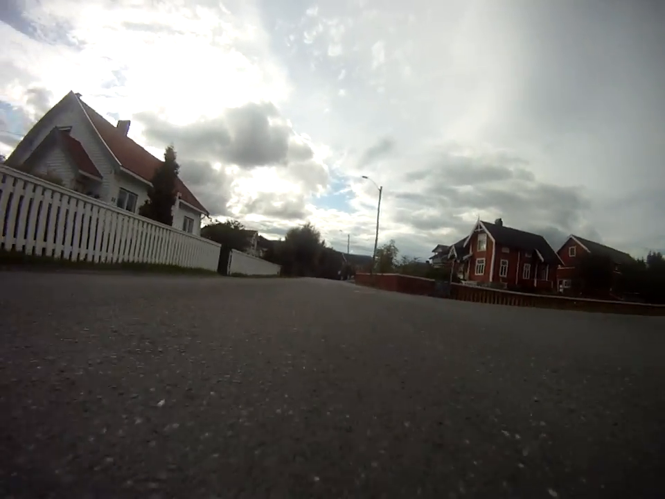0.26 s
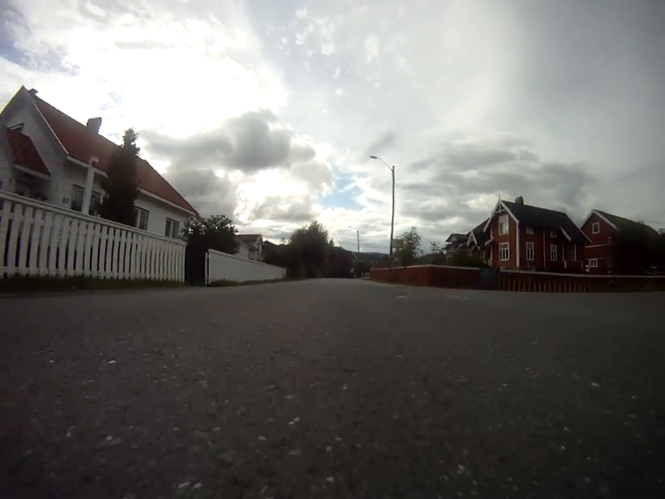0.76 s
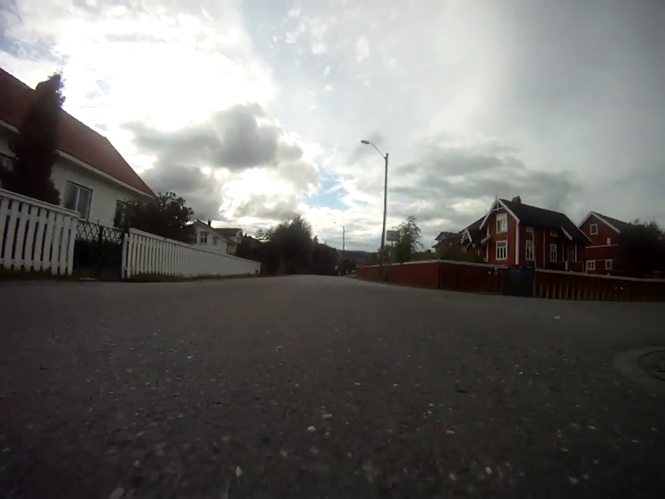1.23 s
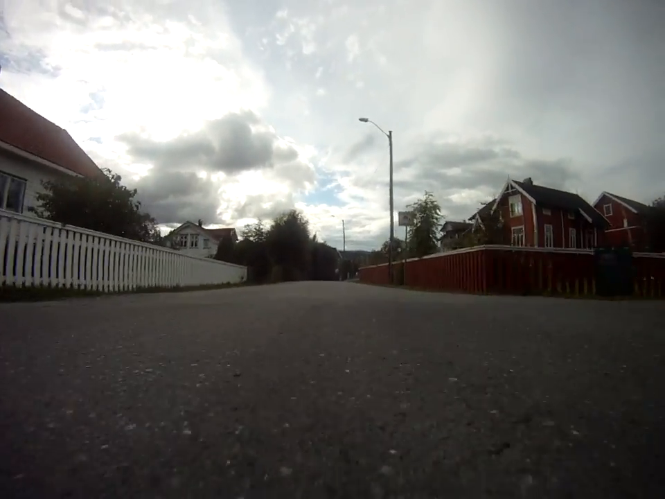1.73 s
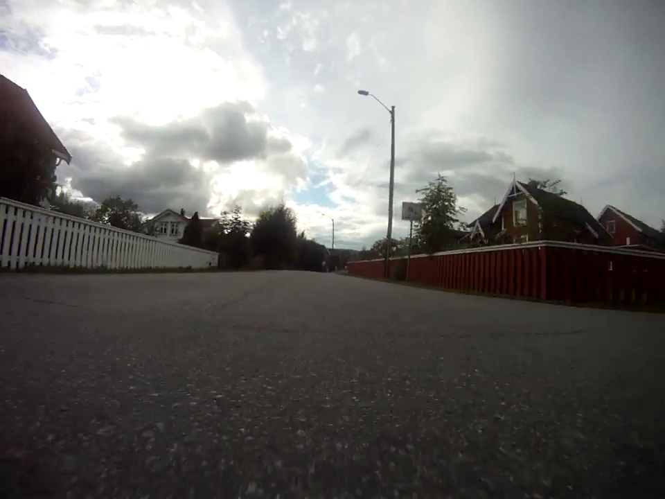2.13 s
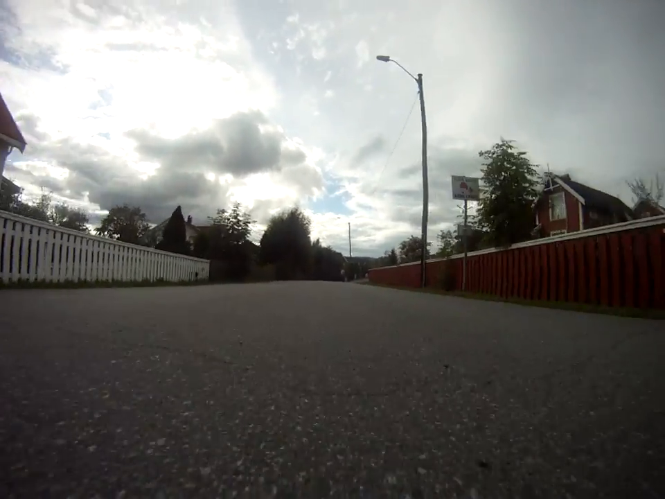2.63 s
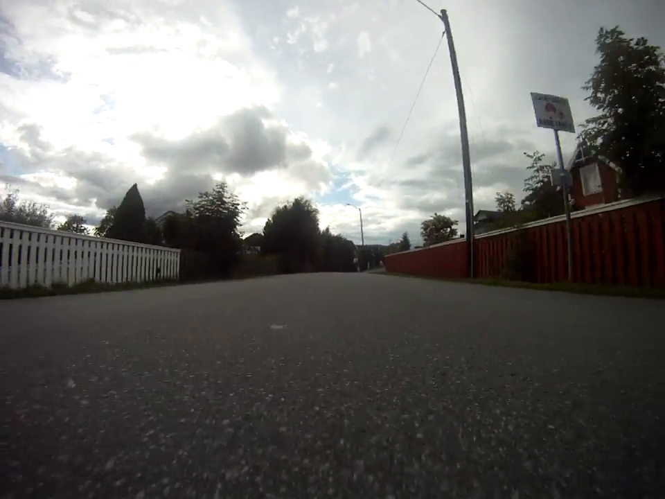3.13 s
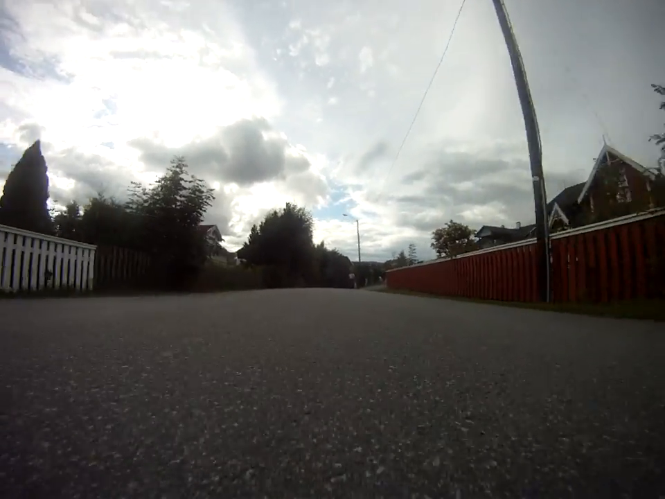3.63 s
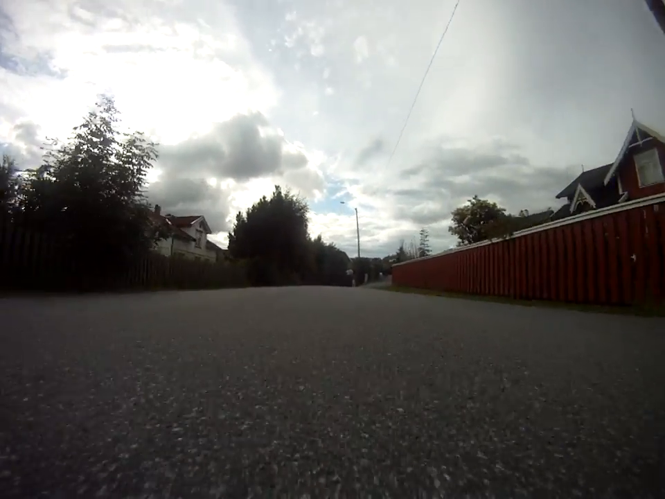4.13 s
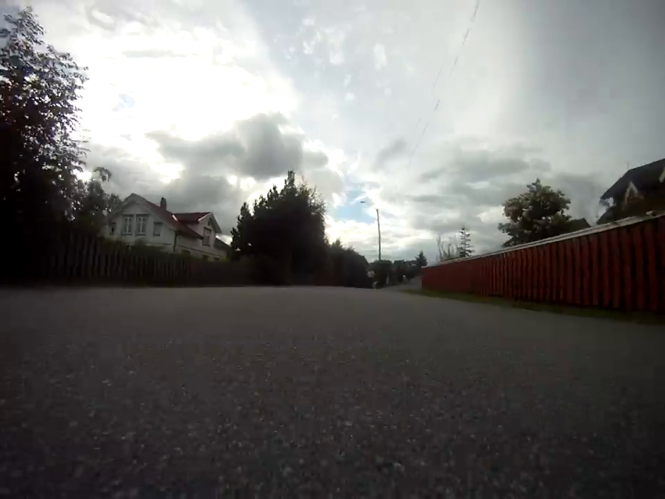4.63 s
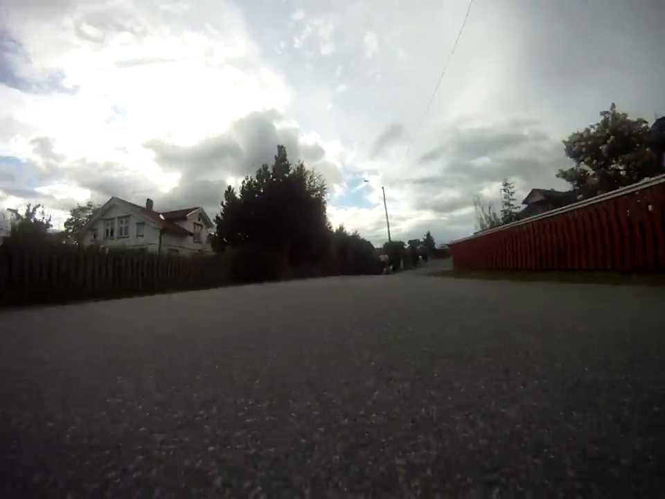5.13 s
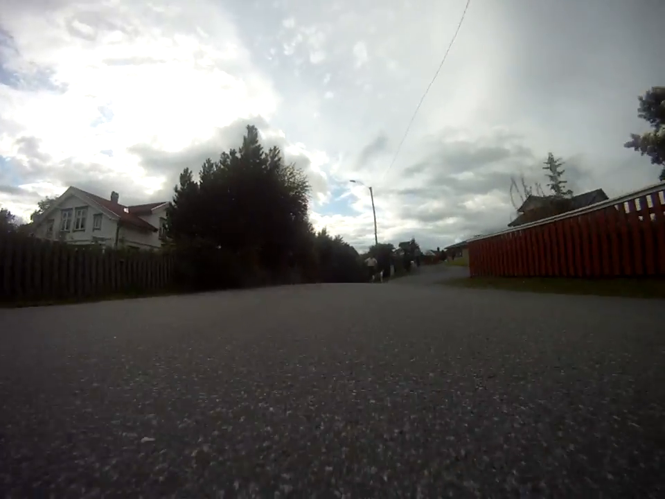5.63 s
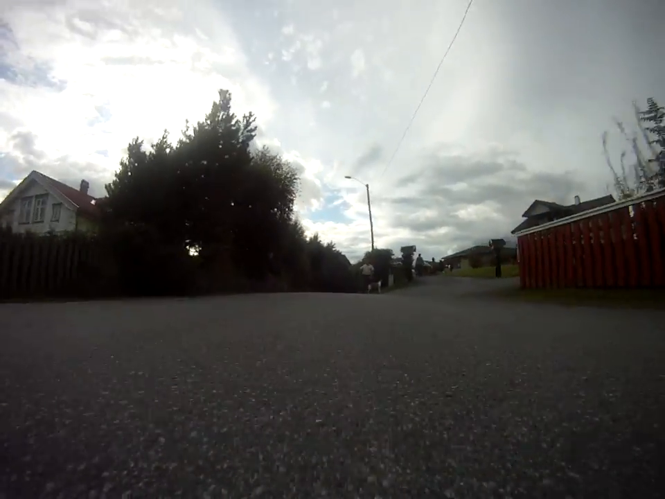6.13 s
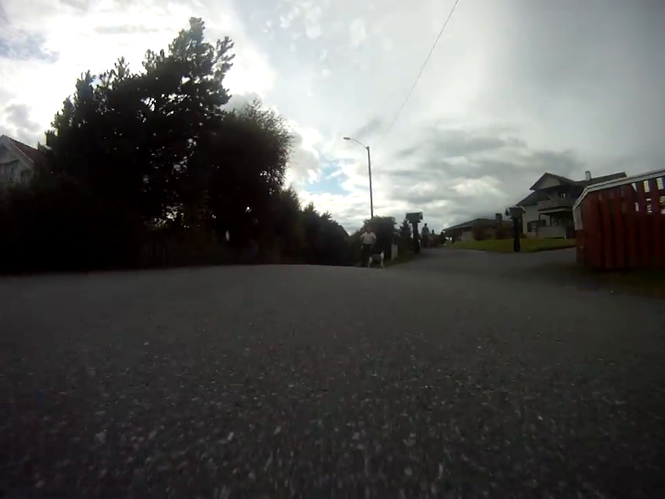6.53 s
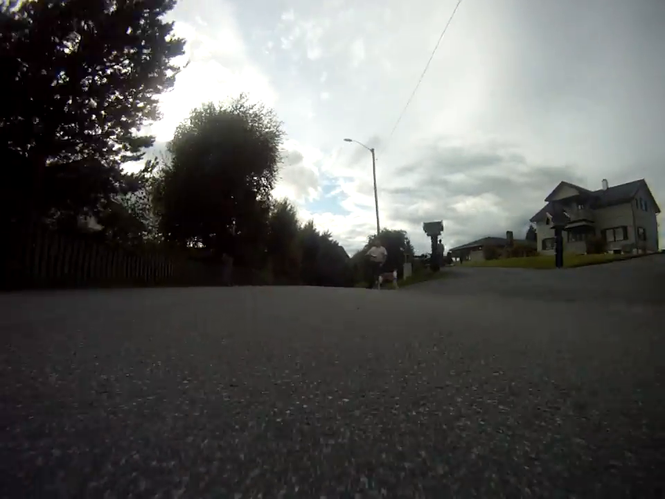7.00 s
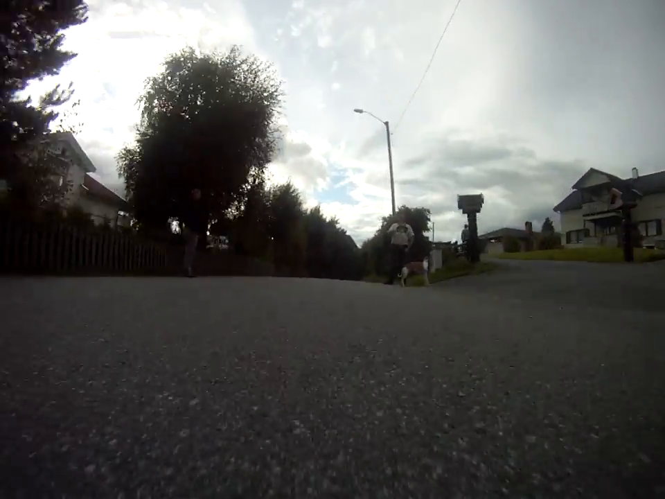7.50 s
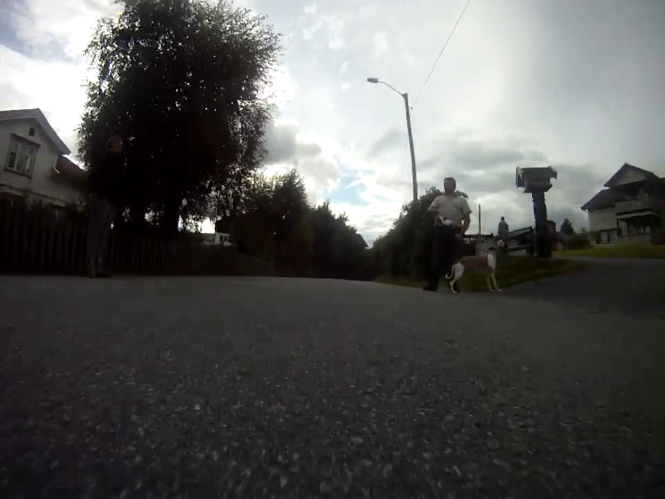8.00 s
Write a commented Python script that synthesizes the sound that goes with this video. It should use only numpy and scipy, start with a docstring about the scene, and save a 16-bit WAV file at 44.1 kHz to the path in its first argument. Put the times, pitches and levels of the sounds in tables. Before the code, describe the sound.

A longboard speeds down a residential street, heard from a camera fixed low on the deck. A low wavering drone and fast rattling chatter run throughout with crackling grit. Stones and cracks clack in clusters, then short sideways scrubs swell into rough rising howls that stop as the wheels grip. The sound is close, boxy and slightly overloaded, without echo.

```python
"""A low, unsteady drone near 100 Hz runs throughout, with a chatter on each of its turns: a longboard rolls
fast over rough asphalt, its deck and mount swinging, and the housing of a camera low on the deck knocks along.
Grit crackles as chance ticks through the housing's modes; coloured noise makes the rumble and wheel roar.
Stones and cracks give decaying sine clacks and short rattles.
In sideways scrubs the rattle hushes and a rough three-partial howl climbs, until the wheels grip again."""
import sys
import numpy as np
from scipy import signal
from scipy.fft import rfft, irfft, next_fast_len
from scipy.io import wavfile
from scipy.ndimage import map_coordinates

SR = 44100
rng = np.random.default_rng(int(sys.argv[2]) if len(sys.argv) > 2 else 0)


def generate_wav(sig):
    """Save sig (samples, or channels by samples) to the path in sys.argv[1] as 16-bit PCM at SR."""
    pcm = np.round(np.clip(np.atleast_2d(sig).T, -1, 1) * 32767).astype(np.int16)
    wavfile.write(sys.argv[1], SR, pcm)


N = 364266

# Main resonance of deck and mount, before its jitter. Each row: time in seconds, pitch in Hz.
DECK_PITCH = [(0.0, 111.6), (0.3, 100.7), (0.58, 112.7), (0.65, 98.14), (0.89, 97.48), (1.04, 101.5),
              (1.12, 117.6), (1.18, 96), (1.49, 108.4), (1.6, 91.5), (1.68, 106.1), (1.95, 93.3),
              (2.24, 105), (2.41, 97), (2.45, 87.06), (2.54, 105), (2.68, 97.9), (2.72, 109.2), (2.83, 94),
              (2.93, 107.2), (2.97, 94.76), (3.03, 114.4), (3.27, 105), (3.33, 117), (3.5, 103.3),
              (3.89, 115.5), (3.95, 102.4), (4.48, 109), (4.73, 93.12), (4.81, 108.3), (4.86, 89.7),
              (4.95, 104.3), (5.04, 94.96), (5.1, 108.6), (5.16, 96.07), (5.44, 108.7), (5.65, 99.3),
              (5.72, 112), (5.92, 95.52), (6.08, 106.6), (6.12, 96.96), (6.26, 116.5), (6.56, 88.05),
              (6.81, 104), (6.86, 118.2), (6.94, 120.3), (7.16, 96.53), (7.32, 110.7), (7.49, 90.9),
              (7.63, 103.5), (7.68, 94.9), (7.8, 106.9), (8.05, 98.93), (8.11, 111.4), (8.18, 99.16),
              (8.25, 110.5)]
# Moments when the swing stalls. Each row: centre in seconds, depth of the dip in its drive in dB.
SWING_STALLS = [(0.259, 6), (0.55, 5), (.97, 9), (1.22, 5), (1.632, 8), (2.62, 9.5), (2.871, 8.5),
                (2.999, 9), (3.319, 19), (3.43, 14.5), (3.77, 4.5), (4.06, 3.5), (4.3, 10), (4.399, 11),
                (4.81, 6), (4.949, 8), (5.513, 14.5), (6.29, 5), (6.632, 8), (6.791, 9.5), (7.635, 11.5),
                (8.03, 9.5)]
# Coarseness of the asphalt under the board. Each row: time in seconds, relative level in dB.
ROAD_COARSENESS = [(0, -28.5), (.25, -28), (.65, -31), (1.1, -26.5), (1.3, -28.5), (1.55, -26),
                   (1.8, -30.5), (1.93, -23), (2.14, -31.5), (2.45, -27.5), (2.95, -27.5), (3.25, -31),
                   (3.8, -29.5), (4.0, -29.5), (4.3, -26.5), (4.55, -29), (4.85, -29), (5.15, -28),
                   (5.45, -27), (5.68, -27.5), (5.9, -29), (6.3, -28.5), (6.55, -29.5), (6.95, -27.5),
                   (7.4, -28), (7.78, -27), (8.26, -26)]
# Stones and cracks under the wheels. Each row: start in seconds, strength of the blow in dB,
# its treble relative to the blow in dB, pitch of the clack in Hz.
STONE_BLOWS = [(0.065, -7.5, -27, 1060), (0.105, -8, -14, 935), (0.158, -7.5, -33, 1100),
               (0.514, -12.5, -16, 940), (0.832, -8, -15, 1090), (0.842, -11, -29, 1030),
               (0.982, -4.5, -35, 810), (0.991, -7.5, -26, 870), (1.043, -9, -24, 1030),
               (1.057, -4, -24, 953), (1.065, -7.5, -28.5, 925), (1.1, -5.5, -31, 950),
               (1.145, -2.5, -26, 1060), (1.182, -8, -30, 980), (1.464, -3.5, -21, 915),
               (1.492, -8, -32, 1030), (1.544, -17, -13, 990), (1.724, -9, -20.5, 820),
               (1.733, -8, -30, 775), (1.749, -10, -14, 1102), (1.771, -7.5, -32, 1070),
               (1.841, -8.5, -14, 910), (1.881, -3.5, -18, 646), (1.891, -8, -27, 630),
               (1.966, -7, -36, 630), (2.049, -13.5, -31, 650), (2.299, -1.5, -18, 810),
               (2.41, -3.5, 0.5, 795), (2.421, -5, 3, 1080), (2.433, -8, -24, 1030), (2.444, -18, -28, 900),
               (2.458, -11, -30, 796), (2.47, -3, -9, 1020), (2.487, -11, -22, 950),
               (2.659, -9.5, -33, 1045), (2.712, -4.5, -20, 1090), (2.721, -1.5, -28, 955),
               (2.779, -2, -14, 835), (2.788, -8.5, -3, 1220), (2.81, -9, -20, 850),
               (2.823, -4.5, -9.5, 980), (2.895, -9, -32, 1130), (2.941, -4, -23, 890),
               (2.961, -5, -27, 990), (3.039, -13.5, -22, 1132), (3.608, -16, -4, 990),
               (3.666, -8, -20, 1040), (3.676, -9, -25, 780), (4.163, -13, -2, 860),
               (4.263, -14.5, -28, 856), (4.362, -17, -30, 950), (4.508, -11, -35, 980),
               (4.574, -11, -34, 907), (4.623, -12, -32, 990), (4.678, -9, -41, 1069),
               (4.722, -15, -5, 993), (4.739, -9, -6, 1006), (4.751, -4.5, -34, 920),
               (5.022, -10.5, -32, 970), (5.15, -12, -29, 994.7), (5.673, -11.5, -13.5, 1110),
               (5.722, -11, -35, 1130), (6.173, -9, -4, 660), (6.193, -7.5, -22, 590.3),
               (6.659, -12, -5.5, 950), (6.732, -18.5, 1, 1090), (6.822, -8.5, -9, 647),
               (6.828, -0.5, -5.5, 1130), (6.898, -4, -22, 1090), (6.921, -8.5, -28, 870),
               (6.933, -9, -23, 840), (6.968, -10, -30, 1103), (7.022, -11, -32, 810),
               (7.088, -10, -16, 1020), (7.115, -26, -6, 990), (7.122, -7.5, -24, 1045),
               (7.205, -8.5, -24, 1080), (7.261, -9, -25, 1090), (7.286, -12, -37, 601),
               (7.438, -10, -30, 820), (7.448, -8.5, -24, 1020), (7.476, -7.5, -7.5, 770),
               (7.479, -6, -7, 830), (7.486, -6, -6.5, 1000), (7.535, -8.5, -28, 954),
               (7.571, -5, -28, 970), (7.581, -9.5, -28, 1050), (7.608, -8, -29, 1070),
               (7.62, -12, -27, 1080), (7.644, -5.5, -13, 960), (7.656, -7.5, -29, 1060),
               (7.683, -11.5, -22, 1065), (7.737, -8.5, -25, 593), (7.842, -8, -25, 900),
               (7.881, -4.5, -25, 1040), (7.986, -5, -28, 990), (8.227, -8, -19, 980)]
# Modes of the camera housing round the microphone. Each row: pitch in Hz, width in Hz, relative level in dB.
HOUSING_MODES = [(332, 580, -14), (422, 337, 0.5), (816, 352, 1), (1096, 388, 0.5), (2074, 247, -3.5),
                 (2385, 280, -7), (3560, 346, -9), (4070, 2800, -21.5), (7260, 8400, -41.5)]
# Spectrum of the board's rumble. Each row: frequency in Hz, relative level in dB per Hz.
RUMBLE_SPECTRUM = [(15, -28), (30, -10), (50, -23), (72, 6), (85, 10), (103, -5.5), (125, 5.5), (155, 3),
                   (195, -1.5), (280, -10.5), (400, -13.5), (700, -27), (1500, -46)]
# Spectrum of the wheels' roar. Each row: frequency in Hz, relative level in dB per Hz.
WHEEL_SPECTRUM = [(150, -40), (350, -16), (520, 8), (660, 0), (850, -5), (1200, -5), (1500, -14.5),
                  (2100, -5), (2800, -32), (3500, -18.5), (5000, -57), (7000, -69)]
# Colour of the snap of the sharper stones. Each row: frequency in Hz, gain in dB.
SNAP_COLOUR = [(300, -1), (1200, -4), (1600, 3.5), (2400, 2), (3600, -7.5), (5000, -9.5), (8000, -15),
               (15000, -43)]
# Response of the sealed camera at the microphone. Each row: frequency in Hz, gain in dB.
CAMERA_RESPONSE = [(20, 0.5), (5300, -3.5), (5850, -11), (6150, -15.5), (6600, -6.5), (12000, -5.5),
                   (15200, -10), (15800, -25)]
# Sideways scrubs of the wheels. Each row: moment of grip in seconds, length of the slide before it in seconds,
# peak roar in dB before its flutter, hush of the rattle in dB, howl level in dB, first howl pitch in Hz,
# last howl pitch in Hz, shudder at the grip in dB (negative: a dip).
WHEEL_SCRUBS = [(3.632, 0.22, -25.5, 2.5, -33, 471, 660, 5), (3.871, 0.089, -38, 0.5, -32, 470, 507, -3),
                (4.166, 0.25, -29.5, 3, -34, 490, 670, -2), (6.171, 0.15, -24, 4.5, -35, 487, 648, 9),
                (6.671, 0.11, -26.5, 2, -41, 559, 705.4, 6.5), (6.829, 0.13, -22.5, 1.5, -34, 510, 700, 5)]

# Swing: cap on its size before hush and flutter, drive, and dB lost per dB of hush in a scrub
STOP_DB, DRIVE_DB, SWING_HUSH = -12, 4.5, 1
JOSTLE_RATE, STEADY = 50, 1.7  # random knots per second; steady part relative to the jostling
STALL_S = .024  # half length of a stall
KICK_DB = -7.8  # stones above this level kick the swing into step
# Turns of the swing, in cycles: the knock, the knock back, the lean of the crests
KNOCK_TURN, RETURN_TURN, LEAN_TURN = .26, .88, .1
THUMP_S, SCRAPE_T60 = .0032, .0045  # length of a thump, 60 dB decay of a scrape, in seconds
GRIT_HISS = .12  # hiss of the finest grit relative to its ticks
PATCH_DB, PATCH_RATE = .8, 30  # patches in the asphalt: depth, random knots per second
# Change of the rattle by a 0 dB stone, and the time constant of its return in seconds
AFTER_STONE_DB, AFTER_STONE_S = -1, 0.0075
CLACK_T60, BODY_T60 = .017, .008  # 60 dB decay of a clack and of its lower body, in seconds
FIRST_CONTACT = 0.73  # a stone's first contact relative to the buzz after it
STRAIGHT_DB, RELEASE_S = -38, 0.053  # roar in straight rolling before its flutter; fade time after a scrub
GRIP_S = 0.019  # half length of the shudder, and fade time of the howl, at the grip
HOWL_ROUGH, HOWL_FLUTTER = .36, 50  # random part of the howl (0-1), its knots per second
IMAGE_HZ, TOP_HZ = 12000, 15800  # centre of the mirrored fizz; upper limit of the band


def amp(db):
    """Decibels to gain."""
    return 10 ** (np.asarray(db) / 20)


def unit(x):
    """Scale to rms 1."""
    return x / np.sqrt(np.mean(np.abs(x) ** 2) + 1e-20)


def curve(rows):
    """(s, value) rows joined by lines, one value per sample."""
    return np.interp(np.arange(N) / SR, *np.transpose(rows))


def colour(points):
    """Gain as a function of frequency through (Hz, dB) points."""
    f, db = np.transpose(points)
    return lambda hz: amp(np.interp(np.log(hz + 1), np.log(f + 1), db))


def filtered(x, response):
    """x times a complex response of frequency."""
    m = next_fast_len(N + 8192)
    spectrum = rfft(x, m) * response(np.fft.rfftfreq(m, 1 / SR))
    return irfft(spectrum, m)[:N]


def noise(points):
    """Coloured noise of rms 1."""
    return unit(filtered(rng.standard_normal(N), colour(points)))


def wobble(rate):
    """A smooth random curve, rate knots a second."""
    knots = rng.standard_normal(4096)
    return map_coordinates(knots, [np.arange(N) * rate / SR], mode="mirror")


def swing(hush_db):
    """Complex motion of the deck: the road jostles the resonance, stops cap it, bumps turn it against itself."""
    drive = amp(DRIVE_DB) * unit(STEADY + wobble(JOSTLE_RATE) + 1j * wobble(JOSTLE_RATE))
    for s, depth_db in SWING_STALLS:
        past = (np.arange(N) / SR - s) / STALL_S
        # the drive dips and comes back with its sign turned
        drive = drive * (past + 1j * amp(-depth_db)) / np.hypot(past, 1)
    capped = drive / (1 + np.abs(drive) ** 4) ** (1 / 4)
    turns = np.cumsum(curve(DECK_PITCH)) / SR
    turns = turns + .065 * wobble(45) + .035 * wobble(120)
    size = amp(STOP_DB - SWING_HUSH * hush_db + 1.02 * wobble(130))
    return size * capped * np.exp(2j * np.pi * turns)


def in_step(motion):
    """Hard stones kick the swing into step: its phase meets the knock at each blow, eased in between."""
    at = [round(s * SR) for s, db, *_ in STONE_BLOWS if db > KICK_DB]
    shift = np.unwrap(2 * np.pi * KNOCK_TURN - np.angle(motion[at]))
    return motion * np.exp(1j * np.interp(np.arange(N), at, shift))


def drone(motion, stiff=0.28, lopsided=0.56):
    """The mount stiffens towards its stops, more on one side: the crests grow pointed and lean."""
    x = motion.real
    leaning = (motion * np.exp(2j * np.pi * LEAN_TURN)).real
    shaped = x + stiff * x * np.abs(x) - lopsided * leaning ** 2
    return amp(-1.0) * filtered(shaped, colour([(10, -38), (45, -3), (70, -0.5), (1000, 10.0)]))


def housing(hz):
    """Causal response of the camera housing: resonant modes of alternating sign."""
    total = 0
    for k, (centre, width, db) in enumerate(HOUSING_MODES):
        damping = 1j * hz * width
        total = total + (-1) ** k * amp(db) * damping / (centre * centre - hz * hz + damping)
    return total


def strike(pushes, hard_share, soft_hz=1100):
    """A share of the contacts is hard; the others are cushioned and lose their treble."""
    hard = rng.random(N) < hard_share
    cushioned = filtered(pushes * ~hard, lambda hz: 1 / (1 + 1j * hz / soft_hz - (hz / soft_hz) ** 2))
    return pushes * hard + amp(1.0) * cushioned


def contacts(motion, turn, scatter_db):
    """One push per swing, about turn cycles after its top, each of a chance size."""
    turns = np.unwrap(np.angle(motion)) / (2 * np.pi) - turn + .025 * wobble(200)
    at = np.flatnonzero(np.diff(np.floor(turns)) > 0)
    chance = np.clip(rng.standard_normal(N)[at], -3, 1.0)
    return np.bincount(at, amp(scatter_db * chance) * np.sqrt(np.abs(motion[at])), N)


def chatter(motion, road, firm):
    """The housing knocks both ways and scrapes for a moment; the more uneven lower knock thumps the deck."""
    lower = contacts(motion, KNOCK_TURN, scatter_db=6)
    knocks = contacts(motion, RETURN_TURN, scatter_db=2.5) - lower
    t = np.arange(SR // 50) / SR
    scrape_level = signal.fftconvolve(np.abs(knocks), t * amp(-60 * t / SCRAPE_T60))[:N]
    scrape = scrape_level * rng.standard_normal(N)
    pushes = strike(unit(knocks) + 0.96 * unit(scrape), hard_share=.5 * firm)
    ring = unit(filtered(pushes, housing))
    dent = np.maximum(1 - np.abs(2 * t / THUMP_S - 1), 0)  # triangular push
    dents = signal.fftconvolve(-lower, dent)[:N]
    thump = unit(filtered(dents, colour([(70, -12), (130, -15), (190, 1), (500, 1)])))
    return amp(-0.5) * road * ring + amp(-14.5) * np.sqrt(road) * thump


def grit(road, firm, per_second=380, scatter_db=4.5):
    """Countless small stones tick under the four wheels and ring the housing."""
    hit = rng.random(N) < per_second / SR
    scatter = amp(scatter_db * np.minimum(rng.standard_normal(N), 1))
    ticks = hit * rng.standard_normal(N) * scatter
    pushes = unit(ticks) + GRIT_HISS * rng.standard_normal(N)
    return road * amp(-7.5) * unit(filtered(strike(pushes, hard_share=.75 * firm), housing))


def rolling(road, roar_db, hush_db, rumble_hush=1.0):
    """Broad rumble of the board, which sinks in a slide, and the fluttering roar of its wheels."""
    rumble = amp(-8.5 - rumble_hush * hush_db) * np.sqrt(road) * noise(RUMBLE_SPECTRUM)
    roar = amp(roar_db + wobble(40)) * noise(WHEEL_SPECTRUM)
    return rumble + roar


def roughness():
    """Shaking by the road in dB: its coarseness, chance patches, and a slight dip after each stone."""
    t = np.arange(SR // 4) / SR
    at = [round(row[0] * SR) for row in STONE_BLOWS]
    jolts = np.bincount(at, [amp(row[1]) for row in STONE_BLOWS], N)
    aftermath = signal.fftconvolve(jolts, np.exp(-t / AFTER_STONE_S))[:N]
    return curve(ROAD_COARSENESS) + PATCH_DB * wobble(PATCH_RATE) + AFTER_STONE_DB * aftermath


def firmness(hush_db, coarse_db=-29, softening=4.2):
    """Contacts are harder on coarse road and turn soft while the wheels slide, 0-1."""
    smooth_db = np.minimum(curve(ROAD_COARSENESS) - coarse_db, 0)
    return amp(smooth_db - softening * np.maximum(hush_db, 0))


def buzz(envelope):
    """A sharp first contact and a cluster of spiky ones after it, with unit energy."""
    chance = rng.standard_normal(len(envelope))
    burst = chance ** 3 * envelope  # cubing makes it spiky
    burst = burst / np.linalg.norm(burst)
    burst[0] -= FIRST_CONTACT
    return burst / np.linalg.norm(burst)


def stones(rattle=0.0055, rise=0.00054, least_snap=0.023, thud_hz=340, thud_t60=0.013,
           settle_db=-16, settle_t60=0.077, least_buzz=0.79, body_ratio=0.64):
    """A stone or crack jolts the board: a thud, a hollow two-mode clack, a housing buzz and a treble snap."""
    rings, blows, snaps = np.zeros((3, N + SR))
    t = np.arange(SR // 20) / SR
    onset = 1 - np.exp(-t / rise)
    for s, db, treble_db, hz in STONE_BLOWS:
        # harder jolts rattle for longer
        envelope = onset * np.exp(-(t / (rattle * amp(db / 2))) ** 2)
        settling = onset * amp(settle_db + db - 60 * t / settle_t60)
        clack = amp(-1.5 - 60 * t / CLACK_T60) * np.sin(2 * np.pi * hz * t)
        clack += amp(-60 * t / BODY_T60) * np.cos(2 * np.pi * body_ratio * hz * t)
        chance_hz = thud_hz * np.exp(0.28 * rng.standard_normal())
        thud = amp(1.5 - 60 * t / thud_t60) * np.sin(2 * np.pi * chance_hz * t)
        start = round(s * SR)
        rings[start:][:len(t)] -= amp(db) * onset * (clack + thud)
        # sharper stones buzz and snap more
        buzz_gain = least_buzz + 1.5 * amp(treble_db / 2)
        blows[start:][:len(t)] += amp(db) * buzz_gain * buzz(envelope + settling)
        snaps[start:][:len(t)] += amp(db) * (least_snap + amp(treble_db)) * buzz(envelope)
    buzzing = amp(21.0) * filtered(blows[:N], housing)
    snapping = amp(24.0) * filtered(snaps[:N], colour(SNAP_COLOUR))
    return rings[:N] + buzzing + snapping


def scrubs():
    """Roar, hush and shudder in dB: roar climbs in each slide, rattle sinks midway and shudders at the grip."""
    t = np.arange(N) / SR
    roar_db, hush_db, shudder_db = np.zeros((3, N))
    for grip, length, peak_db, dip_db, *_, grip_db in WHEEL_SCRUBS:
        slide = np.clip((t - grip) / length + 1, 0, 1)  # 0 before the slide, 1 from the grip on
        release = np.exp(-(np.maximum(t - grip, 0) / RELEASE_S) ** 2)
        roar_db = np.maximum(roar_db, (peak_db - STRAIGHT_DB) * slide ** 0.38 * release)
        hush_db += dip_db * np.abs(np.sin(np.pi * slide)) ** 0.98
        shudder_db += grip_db * np.exp(-((t - grip) / GRIP_S - .5) ** 2)
    return STRAIGHT_DB + roar_db, hush_db, shudder_db


def howl(overtone_db=-6):
    """A sliding wheel sticks and slips: a rough note that climbs and brightens until the wheel grips."""
    t = np.arange(N) / SR
    notes = np.zeros(N)
    for grip, length, _, _, db, start_hz, end_hz, _ in WHEEL_SCRUBS:
        slide = np.clip((t - grip) / length + 1, 0, 1)
        pitch = start_hz + (end_hz - start_hz) * slide ** 0.75
        phase = 2 * np.pi * np.cumsum(pitch) / SR
        envelope = slide ** 0.79 * np.exp(-(np.maximum(t - grip, 0) / GRIP_S) ** 2)
        for k in range(3):
            flutter = wobble(HOWL_FLUTTER) + 1j * wobble(HOWL_FLUTTER)
            partial = (.5 + HOWL_ROUGH * flutter) * np.exp(1j * (k + 1) * phase)
            brightness = (amp(overtone_db) * np.sqrt(slide)) ** k
            notes += amp(db) * envelope * brightness * unit(partial.real)
    return notes


def scene():
    """Everything reaches the microphone through the deck."""
    roar_db, hush_db, shudder_db = scrubs()
    motion = in_step(swing(hush_db))
    road = amp(roughness() - hush_db + shudder_db)
    firm = firmness(hush_db)
    mix = drone(motion) + chatter(motion, road, firm) + grit(road, firm)
    mix = mix + rolling(road, roar_db, hush_db) + stones() + howl()
    return mix[None]


def record(dry):
    """The camera rounds off peaks, mirrors the sound around 12 kHz as a fizz and limits the band."""
    x = dry[0] / (1 + np.abs(dry[0] / .85) ** 6) ** (1 / 6)
    # the fizz is fed by the slope of the sound below half the mirror frequency
    slope = filtered(x, lambda hz: 1j * hz / IMAGE_HZ * (hz < IMAGE_HZ / 2))
    fizz = amp(11.0) * slope * np.cos(2 * np.pi * IMAGE_HZ * np.arange(N) / SR)
    return filtered(x + fizz, lambda hz: colour(CAMERA_RESPONSE)(hz) * (hz < TOP_HZ))[None]


dry = scene()
out = record(dry)
generate_wav(out)
```